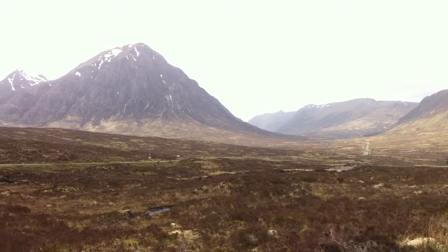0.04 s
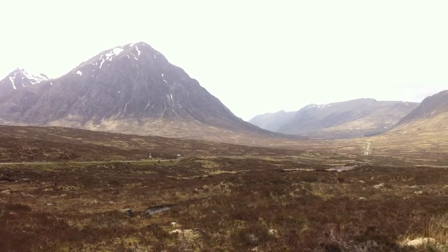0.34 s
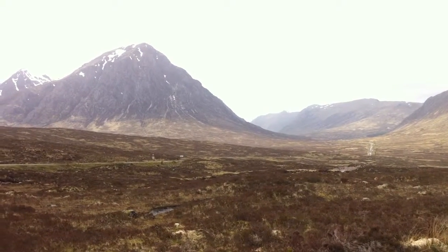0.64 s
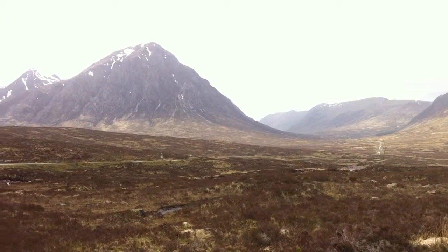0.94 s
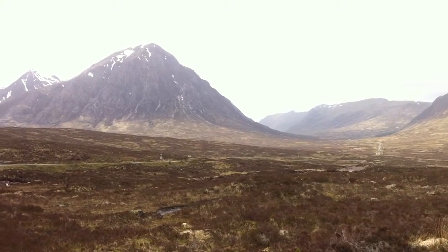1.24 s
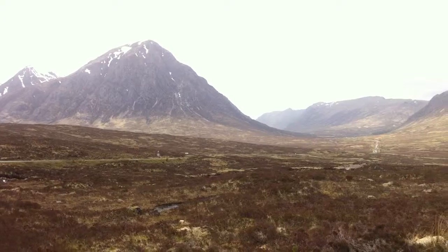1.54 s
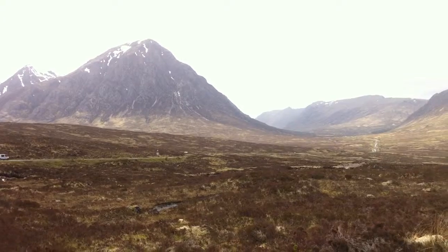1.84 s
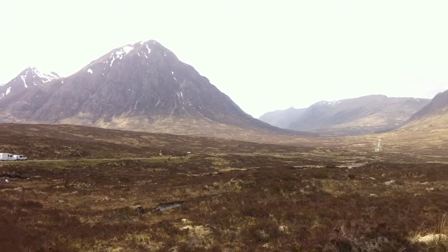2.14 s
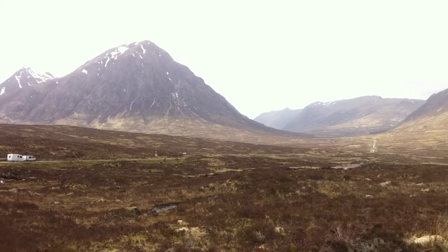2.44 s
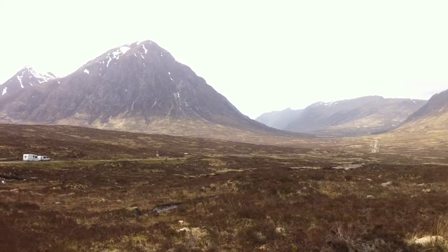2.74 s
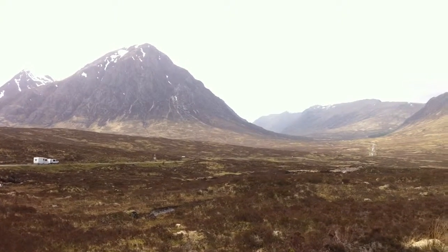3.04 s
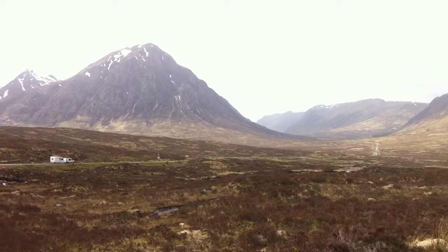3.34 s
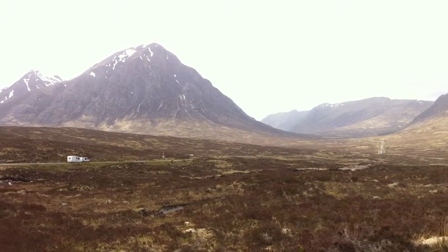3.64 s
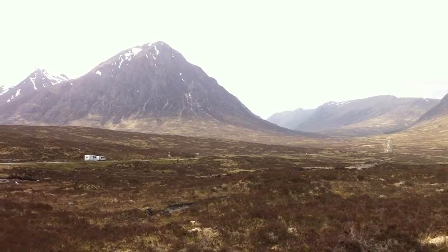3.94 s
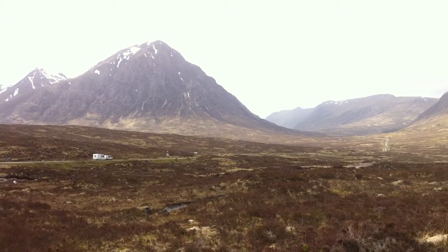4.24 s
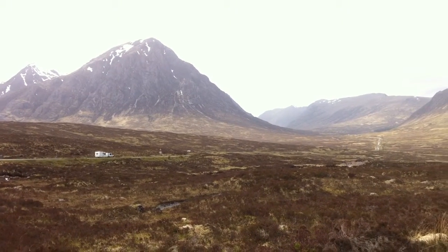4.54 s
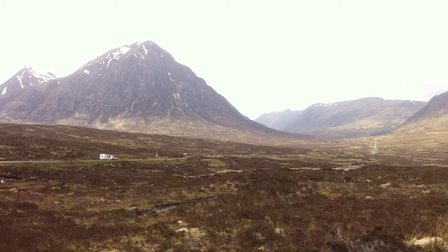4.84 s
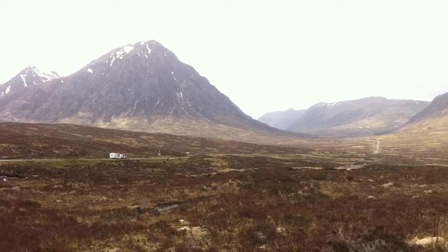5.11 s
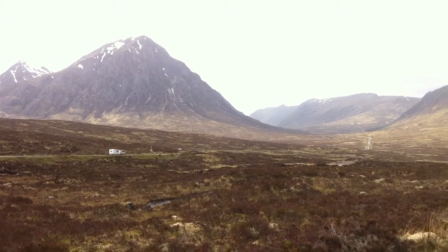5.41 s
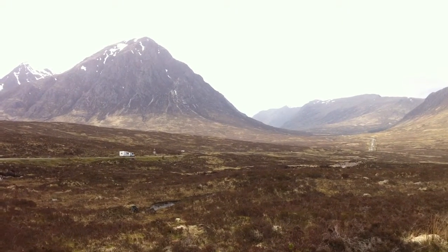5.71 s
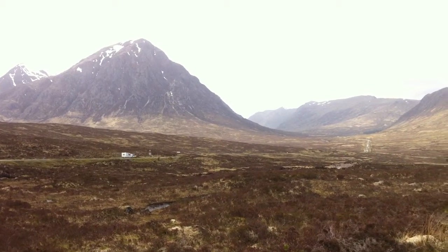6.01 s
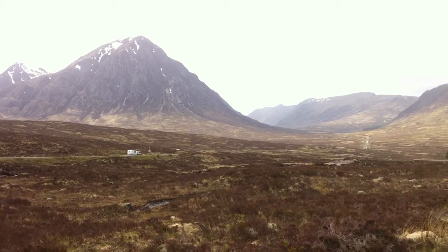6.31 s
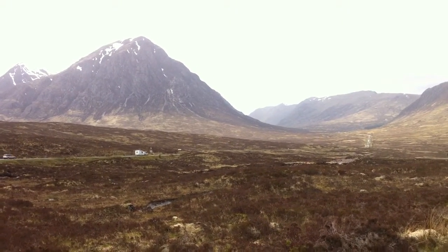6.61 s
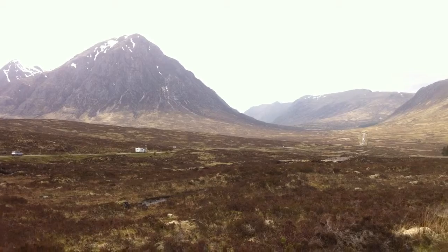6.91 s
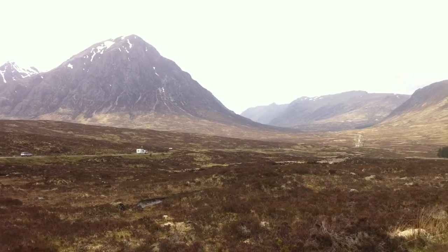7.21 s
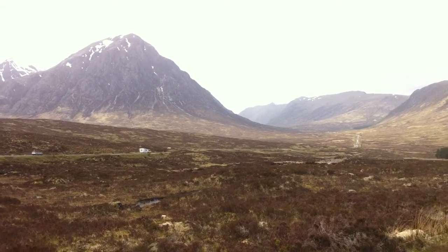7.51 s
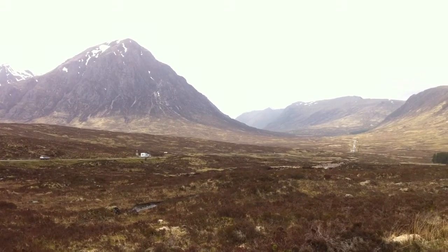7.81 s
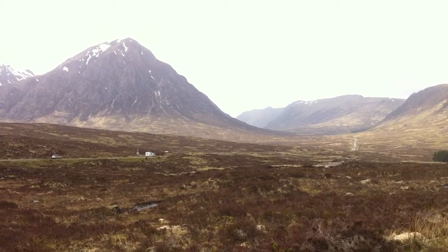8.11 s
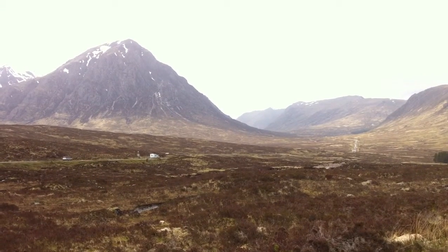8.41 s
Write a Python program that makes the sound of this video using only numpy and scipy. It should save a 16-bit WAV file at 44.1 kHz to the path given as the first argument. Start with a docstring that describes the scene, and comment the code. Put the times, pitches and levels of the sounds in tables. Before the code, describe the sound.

Strong wind blows across open moorland and hits a bare microphone up close. It makes a low, lumpy rumble that swells and drops in uneven gusts, with short crackling bursts and pops. The hardest gust comes about halfway through, then the wind gradually weakens and nearly dies away at the end. Far behind it are a faint tyre roar from a road and a slight hiss.

```python
"""Strong wind on open moorland blows across a bare camera microphone.
Eddies sweep past the port as a lumpy rumble that brightens with speed; the hardest burst and pop.
Behind it lie the tyre roar of a far road, one faint rustle and the microphone's own hiss.
A limiter catches the big blows, ducks the traffic and the hiss, and lets them back over a second."""
import sys
import numpy as np
from scipy import signal
from scipy.fft import rfft, irfft
from scipy.io import wavfile
from scipy.ndimage import uniform_filter1d, minimum_filter1d, map_coordinates

SR = 44100
rng = np.random.default_rng(int(sys.argv[2]) if len(sys.argv) > 2 else 0)


def store_pcm(level_fs):
    """Save levels as 16-bit WAV."""
    pcm = np.round(np.clip(level_fs, -1, 1) * 32767).astype(np.int16)
    wavfile.write(sys.argv[1], SR, np.atleast_2d(pcm).T)


N = 373086
TIME = np.arange(N) / SR
HZ = np.fft.rfftfreq(N, 1 / SR)
EDDY_SAMPLES = 100  # size of a typical eddy in a frozen pressure pattern


def gain_of(db):
    return 10 ** (np.asarray(db) / 20)


def unit_rms(x):
    return x / np.sqrt(np.mean(x ** 2) + 1e-20)


def equalise(x, curve):
    """Shapes x with an EQ curve of (freq_hz, gain_db) points."""
    hz, db = np.transpose(curve)
    return irfft(rfft(x) * gain_of(np.interp(np.log(HZ + 1), np.log(hz), db)), N)


def noise(gains):
    """Noise of rms 1, shaped by a gain at each frequency."""
    return unit_rms(irfft(rfft(rng.standard_normal(N)) * gains, N))


def noise_bed(curve):
    """Noise of rms 1, shaped by an EQ curve."""
    return unit_rms(equalise(rng.standard_normal(N), curve))


def wander(slow_hz, fast_hz):
    """A smooth random modulator that moves at rates between the two given."""
    return noise(HZ / (HZ + slow_hz) * np.exp(-(HZ / fast_hz) ** 2))


def add(mix, start_s, sound):
    """Lays a sound into the mix, trimming what overhangs either end."""
    start = round(start_s * SR)
    part = mix[max(start, 0):][:len(sound) + min(start, 0)]
    part += sound[max(-start, 0):][:len(part)]


# tone of the noise floor: freq_hz, relative_db
HISS_EQ = [(50, 3.5), (2000, 6.5), (4500, 8), (7000, 1.5), (11000, -0.5), (15500, 1)]


def microphone_hiss(level_db=-70.5):
    """The microphone's own steady hiss."""
    return gain_of(level_db) * noise_bed(HISS_EQ)


# tone of tyre roar, dulled by distance: freq_hz, relative_db
TYRE_EQ = [(40, -23), (150, 0.5), (400, -5.5), (700, 1), (1130, 2.5), (1350, -1.5), (1600, -1), (2000, -8),
           (2500, -16.5), (3300, -28.5), (4800, -39), (7000, -35.5), (12000, -49)]
# fader ride of the far road: time_s, level_db
TRAFFIC_RIDE = [(0, -55.5), (0.6, -53), (1.8, -51), (2.7, -53), (3.7, -53), (4.8, -52.5), (5.5, -55),
                (6.0, -53), (6.35, -49), (6.75, -53.5), (7.2, -51), (7.6, -49.5), (7.9, -50.5),
                (8.46, -48.5)]


def traffic(waver_db=-1.46):
    """Far tyre roar that wavers as the wind carries it."""
    ride_db = np.interp(TIME, *np.transpose(TRAFFIC_RIDE))
    level_db = ride_db + waver_db * wander(slow_hz=0.65, fast_hz=4.3)
    return noise_bed(TYRE_EQ) * gain_of(level_db)


def rustle(centre_s=1.495, fade_s=0.021, level_db=-43, centre_hz=1500, half_width_hz=260):
    """One brief, faint rustle in a lull."""
    band = noise(1 / (1 + ((HZ - centre_hz) / half_width_hz) ** 2))
    return gain_of(level_db) * band * np.exp(-((TIME - centre_s) / fade_s) ** 2)


def low_cut(x, corner_hz=144.5):
    """The microphone passes little of the deepest pressure swings."""
    return signal.sosfilt(signal.butter(3, corner_hz, btype="high", fs=SR, output="sos"), x)


def turbulence(slow_hz, fast_hz):
    """The air's random unsteadiness, as a modulator soft-clipped to +-2."""
    return 2 * np.tanh(wander(slow_hz, fast_hz) / 2)


def eddy_field(steepness):
    """A frozen pattern of pressure; the steeper its slope, the weaker the small eddies."""
    wavenumber = HZ * EDDY_SAMPLES / SR
    return noise((1 + wavenumber ** 2) ** (-steepness / 2))


def sweep(field, eddy_hz, start=0):
    """Carries the pattern past the port: faster air plays it higher."""
    place = start + np.cumsum(eddy_hz) * EDDY_SAMPLES / SR
    return map_coordinates(field, [place % (N - 1)], order=3, prefilter=False, mode="wrap")


# the bed of wind between gusts, its eddy rate rising with air speed: time_s, level_db, eddy_hz
BREEZE_RIDE = [(0.0, -33, 287), (0.55, -31.5, 211.5), (1.0, -26.5, 434.5), (1.401, -36, 535),
               (1.8, -34.0, 409.5), (2.15, -31.5, 377.6), (2.65, -23, 317.4), (3.15, -28.5, 289.7),
               (3.7, -24, 288.4), (4.3, -22.5, 437.3), (4.75, -28, 312.9), (5.35, -35, 227.8),
               (5.75, -35, 234.3), (6.4, -32, 311.4), (6.879, -38, 206.5), (7.301, -34.5, 295.1),
               (7.8, -41, 253.1), (8.46, -52, 237.3)]
# gusts that build to a crest and drop away: crest_s, level_db, build_s, drop_s, crest_eddy_hz
GUST_CUES = [(0.016, -20.0, 0.051, 0.03786, 343.5), (0.256, -16.5, 0.29, 0.113, 462.5),
             (0.836, -14.5, 0.072, 0.03753, 533.4), (1.157, -15.5, 0.095, 0.0833, 588.5),
             (1.305, -11.5, 0.082, 0.029, 648.2), (1.592, -21, 0.137, 0.198, 585),
             (1.791, -19.0, 0.043, 0.033, 493.8), (1.977, -24.5, 0.10356, 0.0871, 479.8),
             (2.376, -14.5, 0.133, 0.193, 710.2), (2.475, -12, 0.101, 0.03, 636.5),
             (2.965, -14.5, 0.14, 0.156, 486.3), (3.268, -19, 0.0441, 0.2308, 412),
             (3.494, -17.5, 0.2107, 0.136, 408.9), (3.744, -21.5, 0.072, 0.058, 323.4),
             (3.987, -7.5, 0.1, 0.128, 742.3), (4.253, -14, 0.141, 0.214, 714.4),
             (4.631, -9, 0.066, 0.054, 500.6), (4.836, -12.5, 0.077, 0.072, 503.6),
             (5.098, -15.5, 0.053, 0.106, 379.4), (5.211, -16.7, 0.088, 0.058, 360.3),
             (5.441, -21.0, 0.04, 0.07, 279.2), (6.029, -23, 0.153, 0.1177, 339.7),
             (6.21, -20.5, 0.04666, 0.071, 381.2), (6.535, -22.5, 0.11, 0.121, 409.5),
             (6.99, -31.5, 0.055, 0.051, 242), (7.137, -25.5, 0.093, 0.062, 438.5),
             (7.45, -19, 0.066, 0.131, 423.8), (7.603, -24.5, 0.02, 0.154, 263.3),
             (7.946, -32.5, 0.063, 0.145, 314.8), (8.187, -29, 0.119, 0.15, 316)]


def wind_curves(depth_db=12, roundness=1.4, speed_law=0.21):
    """Gusts over the breeze, the strongest setting the speed: returns time_s, level_db, eddy_hz."""
    time_s = TIME[::100]
    breeze_s, breeze_db, breeze_hz = np.transpose(BREEZE_RIDE)
    powers = [gain_of(np.interp(time_s, breeze_s, breeze_db)) ** 2]
    rates = [np.interp(time_s, breeze_s, breeze_hz)]
    for crest_s, level_db, build_s, drop_s, crest_eddy_hz in GUST_CUES:
        from_crest = abs(time_s - crest_s) / np.where(time_s < crest_s, build_s, drop_s)
        swell = gain_of(-depth_db * from_crest ** roundness)  # roundness 1 is pointed, 2 is round
        powers.append((gain_of(level_db) * swell) ** 2)
        rates.append(crest_eddy_hz * swell ** speed_law)
    return time_s, 10 * np.log10(np.sum(powers, axis=0)), np.average(rates, axis=0, weights=powers)


def rumble(lurch_db=4.0, lurch_swing=.13, flick_db=2.5, flick_swing=.14, trim_db=-0.5, eddy_scale=.915):
    """The air lurches many times a second and flicks within each lurch; faster is louder and brighter."""
    time_s, wind_db, wind_hz = wind_curves()
    lurch = turbulence(slow_hz=9.95, fast_hz=75.16)
    flick = turbulence(slow_hz=39, fast_hz=215)
    speed = np.exp(lurch_swing * lurch + flick_swing * flick)
    eddy_hz = eddy_scale * np.interp(TIME, time_s, wind_hz) * speed
    eddies = sweep(eddy_field(steepness=4.64), eddy_hz)
    pressure = low_cut(eddies * gain_of(lurch_db * lurch + flick_db * flick))
    power = uniform_filter1d(uniform_filter1d(pressure ** 2, size=2000), size=1200)
    levelled = pressure / np.sqrt(abs(power) + 1e-12)  # keeps the fast lumps; the wind sets the swells
    return levelled * gain_of(np.interp(TIME, time_s, wind_db) + trim_db)


# single vortices crossing the port: centre_s, peak_db, pitch_hz, roundness (2 is tight, 12 is smooth)
POP_CUES = [(0.2996, 13.5, 662, 1.1), (2.4528, -4.5, 700.8, 2.2), (6.362, -1.5, 435, 0.8),
            (6.632, -5, 494, 2.2), (7.2373, 0, 693.7, 4.4)]


def pops():
    """A lone vortex gives one suck and one push; the tighter its core, the more it snaps."""
    out, t = np.zeros(N), np.arange(-.03, .04, 1 / SR)
    for centre_s, peak_db, pitch_hz, roundness in POP_CUES:
        angle = 2 * np.pi * pitch_hz * t
        pressure = angle / (1 + angle ** 2 / (2 * roundness)) ** roundness
        pop = low_cut(np.hanning(len(t)) * pressure)
        add(out, centre_s + t[0], gain_of(peak_db) * pop / abs(pop).max())
    return out


def lesser_knots(per_s=11, above_wind_db=9.5, spread_db=2.0, eddy_scale=0.97, eddies_long=2.6):
    """Random buffet cues that follow the wind: long soft puffs in slow air, short slaps in fast."""
    time_s, wind_db, wind_hz = wind_curves()
    slip, strength, length = rng.uniform(-1, 1, (200, 3)).T
    centre_s = (np.arange(len(slip)) + .5 + slip / 2) / per_s
    peak_db = np.interp(centre_s, time_s, wind_db) + above_wind_db + spread_db * strength
    eddy_hz = eddy_scale * np.interp(centre_s, time_s, wind_hz)
    length_s = eddies_long / eddy_hz * (1 + length / 2)
    cues = np.transpose([centre_s, peak_db, length_s, eddy_hz])
    return list(cues[centre_s < time_s[-1]])


# the hardest knots of fast air to hit the port: centre_s, peak_db, nominal_length_s, eddy_hz
BUFFET_CUES = [(0.028, -11, 0.004, 747), (0.138, 0, 0.007, 687), (0.202, -1.5, 0.004, 389.4),
               (0.212, 0.1, 0.005, 1096), (0.843, 4, 0.0065, 1128), (0.857, 3, 0.007, 1139),
               (0.942, -7.5, 0.0082, 406), (1.266, 0.2, 0.006, 889), (1.299, 8.5, 0.013, 868.6),
               (1.313, 4.5, 0.0035, 1187), (1.556, -5.5, 0.0041, 548), (1.624, -3, 0.0046, 615),
               (1.771, -11, 0.005, 616), (1.901, -8, 0.0059, 369.3), (2.018, -4, 0.0059, 328),
               (2.261, -5.5, 0.0043, 612), (2.289, -8, 0.007, 683), (2.37, -9, 0.012, 888),
               (2.492, 5, 0.0044, 1142), (2.639, -4.5, 0.007, 329.7), (2.868, 4, 0.008, 960.5),
               (2.942, -1, 0.01, 742), (2.983, 3.1, 0.014, 662), (3.05, -5, 0.014, 317.3),
               (3.292, -2.5, 0.0055, 460.6), (3.418, -3.5, 0.0083, 330.3), (3.543, 8, 0.0035, 1046),
               (3.848, -3, 0.008, 360), (3.858, 0.5, 0.009, 900), (3.932, 5.5, 0.009, 1053),
               (3.961, 5.5, 0.0067, 1691), (3.976, 20.5, 0.0058, 1151), (4.031, 5.5, 0.009, 715),
               (4.064, 14, 0.0077, 1277), (4.116, -0.3, 0.009, 850), (4.198, 1.1, 0.01, 639),
               (4.257, 1.5, 0.01, 897), (4.3, 0.4, 0.009, 803), (4.338, 0.5, 0.011, 827),
               (4.393, -5.5, 0.009, 874), (4.429, -2.5, 0.0066, 672), (4.516, 6, 0.011, 851),
               (4.585, -3.5, 0.013, 650), (4.651, 1.3, 0.014, 910), (4.681, -1.9, 0.0055, 658),
               (4.822, -11.5, 0.0036, 670), (4.937, 3.5, 0.0069, 907), (4.949, -4, 0.012, 896),
               (5.024, -9.5, 0.013, 630), (5.074, -6, 0.01, 298.5), (5.2, 1.5, 0.0092, 747),
               (5.273, -14, 0.0081, 274.7), (5.336, -6, 0.0035, 391.3), (5.45, -5, 0.012, 397.4),
               (6.047, -7, 0.012, 461), (6.174, -6.5, 0.0065, 430), (6.203, -11, 0.0095, 609),
               (7.068, -2, 0.006, 413.7), (7.145, -13.5, 0.0078, 485.5), (7.472, 4, 0.0058, 1091),
               (7.487, 1, 0.014, 483.5), (7.538, -3, 0.0077, 649), (7.907, -4, 0.0061, 394),
               (8.106, -13.5, 0.007, 363), (8.301, -18.5, 0.012, 270)]


def buffets(edge_speed=.65, stretch=1.014, front_ratio=0.763, flick_swing=0.2815, flick_db=1.5,
            tear_hz=950):
    """In each knot the air speeds up for a few milliseconds; its fastest flicks crack."""
    smooth, torn = eddy_field(steepness=5.27), eddy_field(steepness=4.82)
    flicks = turbulence(slow_hz=121, fast_hz=360)
    out, t = np.zeros(N), np.arange(-.03, .04, 1 / SR)
    offsets = (rng.random(300) * (N - len(t))).astype(int)  # each knot plays a random slice of air
    for (centre_s, peak_db, length_s, eddy_hz), offset in zip(BUFFET_CUES + lesser_knots(), offsets):
        width_s = stretch * length_s * np.where(t < 0, front_ratio, 1)  # front steeper than wake
        swell = np.exp(-np.pi / 2 * abs(t / width_s) ** 2.4)
        flick = flicks[offset:offset + len(t)]
        flick = flick - np.average(flick, weights=swell)  # flicks swing about the knot's own speed
        speed = (edge_speed + (1 - edge_speed) * swell) * np.exp(flick_swing * flick)
        torn_share = 1 / (1 + (tear_hz / eddy_hz) ** 6)  # only the fastest knots tear into small eddies
        pressure = (1 - torn_share) * sweep(smooth, eddy_hz * speed, offset)
        pressure += torn_share * sweep(torn, eddy_hz * speed, offset)
        burst = low_cut(swell * gain_of(flick_db * flick) * pressure)
        add(out, centre_s + t[0], gain_of(peak_db) * burst / abs(burst).max())
    return out


# colour that the port adds on top of all the wind levels above: freq_hz, gain_db
PORT_EQ = [(40, -7), (80, -6), (170, 1), (400, -2), (1000, -1.5), (1500, -1), (2200, -3), (3300, 0.5),
           (4600, -1), (8000, -1)]


def wind_at_port(fade_in_s=.005):
    """Rumble, buffets and pops all reach the microphone through its port."""
    fade_in = np.sin(np.pi / 2 * np.minimum(TIME / fade_in_s, 1)) ** 2
    return equalise(fade_in * (rumble() + buffets() + pops()), PORT_EQ)


def scene():
    """Mono mix: wind up front, over the far road, the rustle and the hiss."""
    return (wind_at_port() + traffic() + rustle() + microphone_hiss())[None]


def record(dry, ceiling=.71, release_s=0.99, start_gain_db=-1.5, high_cut_hz=15800):
    """The limiter ducks just ahead of each peak and recovers slowly; a high cut follows."""
    needed_gain = minimum_filter1d(ceiling / np.maximum(abs(dry[0]), ceiling), size=61)
    release = np.exp(-TIME / release_s)
    duck = np.maximum.accumulate((1 - needed_gain) / release) * release
    # the wind was already blowing, so the gain starts a little down
    duck = np.maximum(duck, (1 - gain_of(start_gain_db)) * release)
    gain = 1 - uniform_filter1d(uniform_filter1d(duck, size=31), size=31)
    high_cut = signal.firwin(511, high_cut_hz, window=("kaiser", 9), fs=SR)
    return signal.oaconvolve(dry * gain, high_cut[None], "same")


dry = scene()
out = record(dry)
store_pcm(out)
```